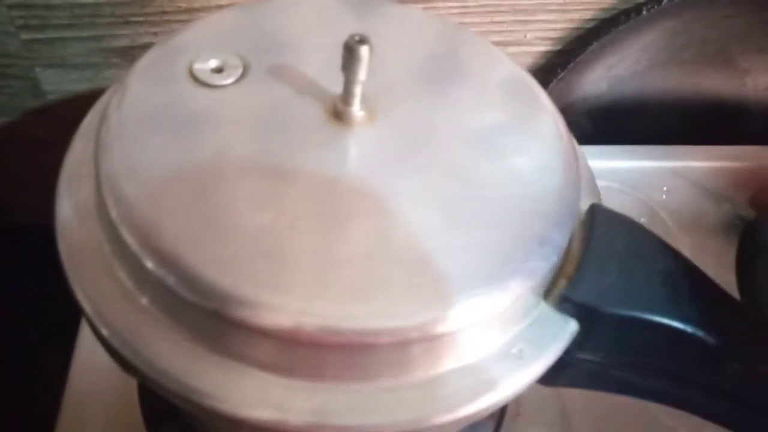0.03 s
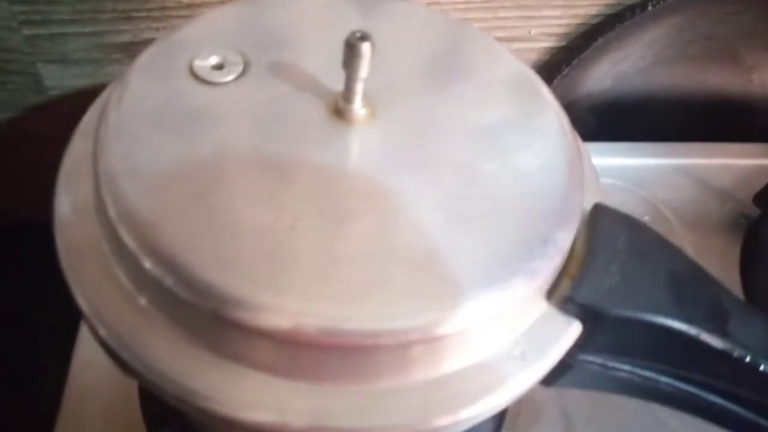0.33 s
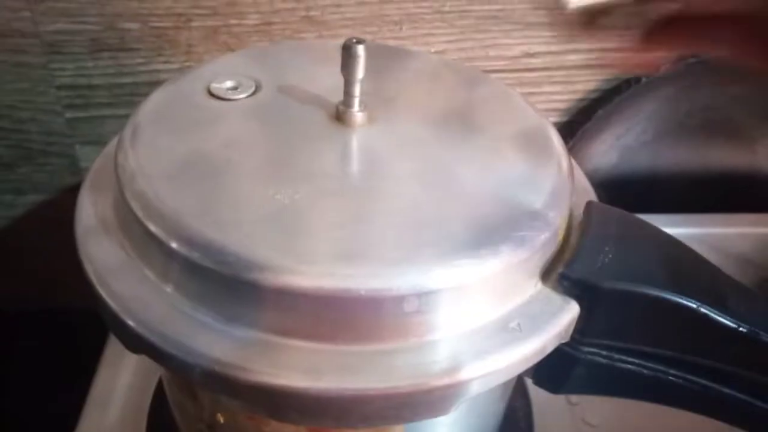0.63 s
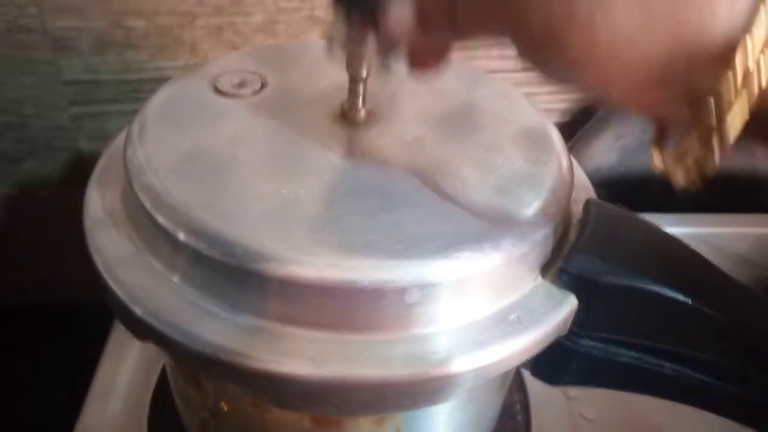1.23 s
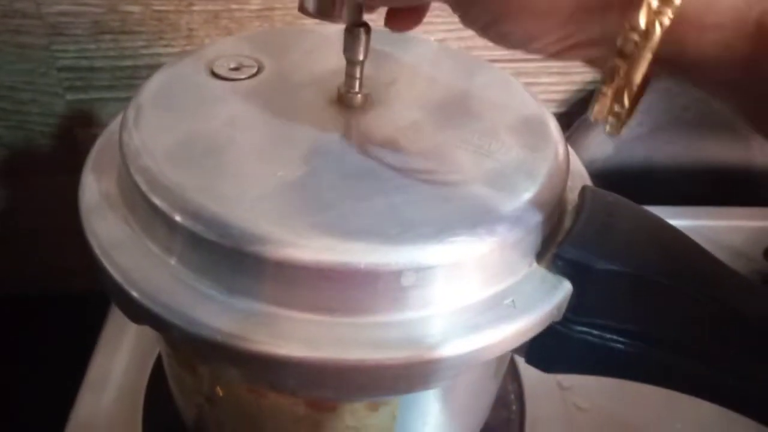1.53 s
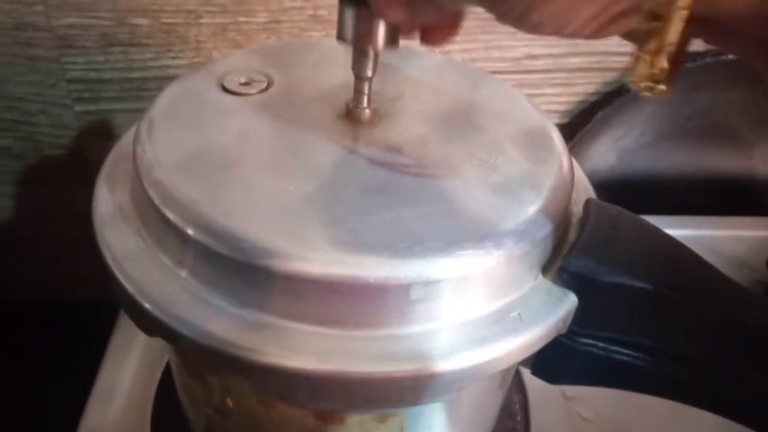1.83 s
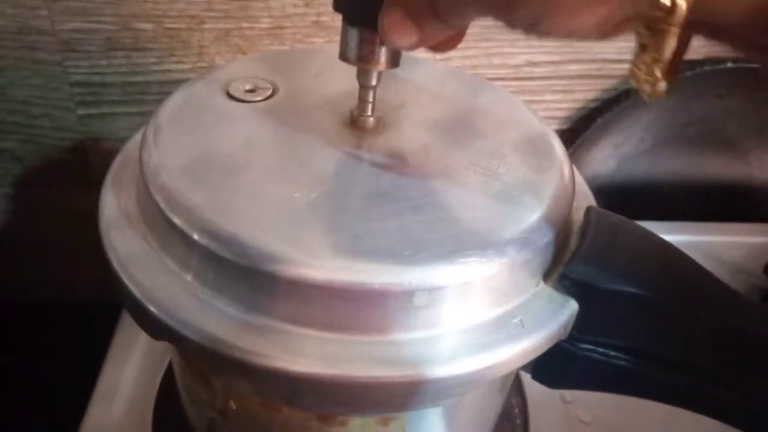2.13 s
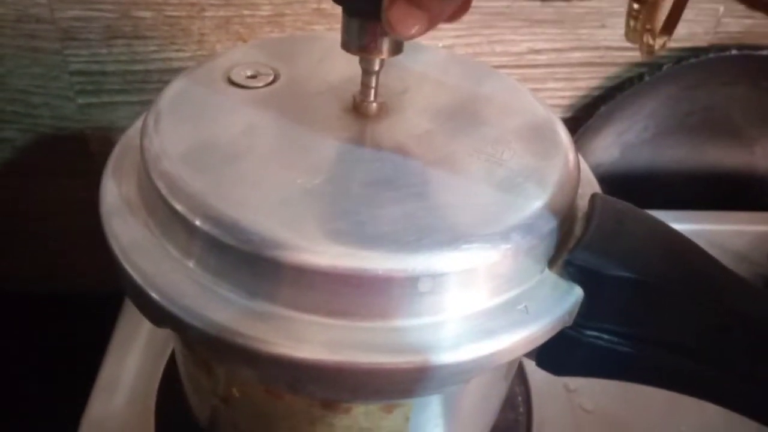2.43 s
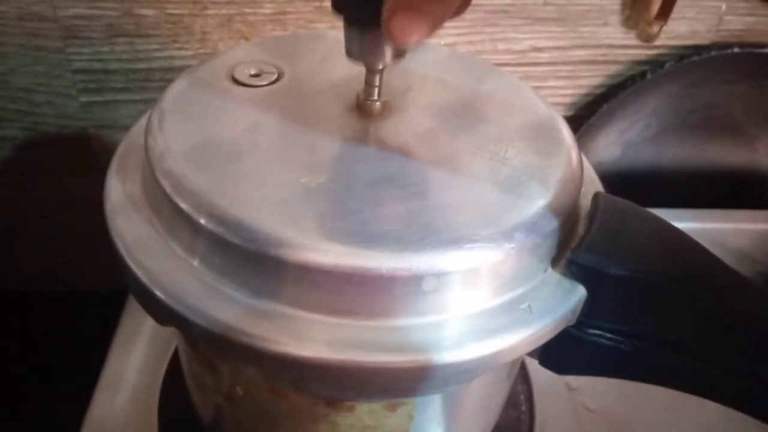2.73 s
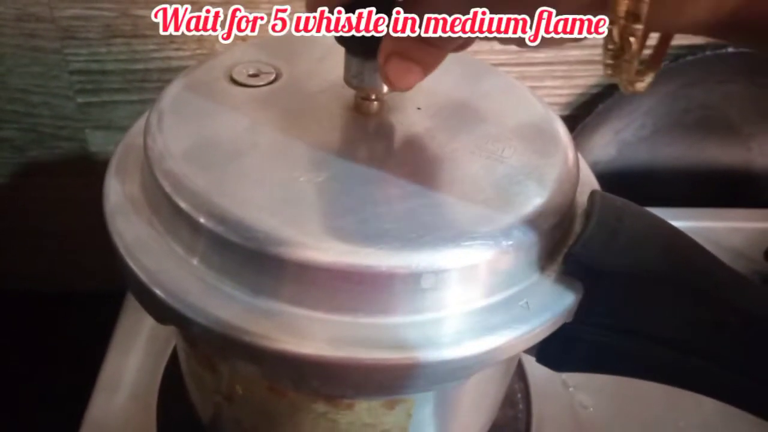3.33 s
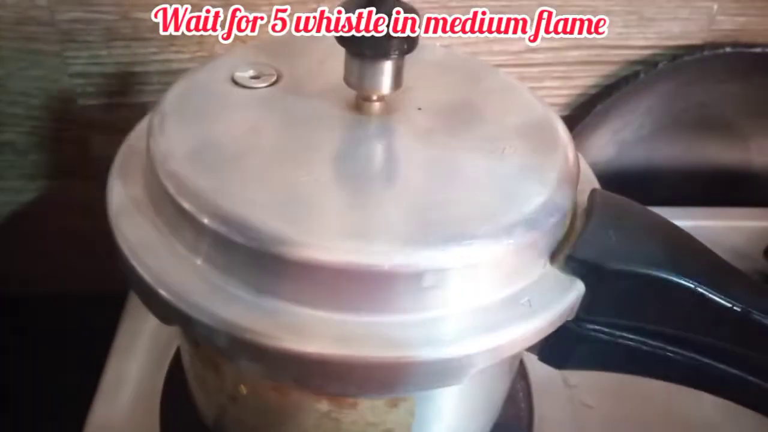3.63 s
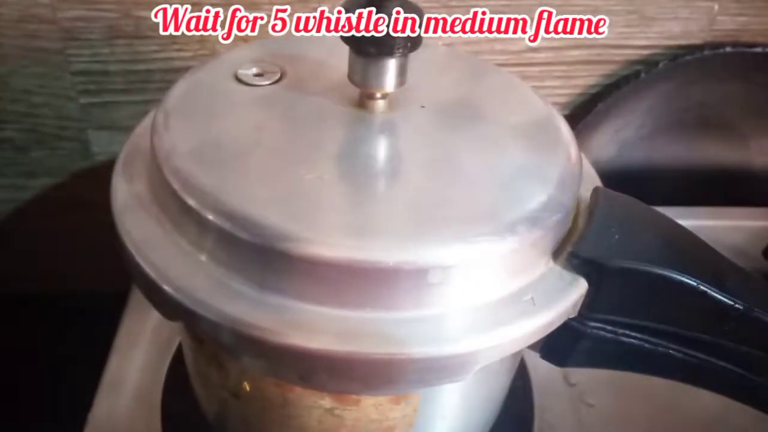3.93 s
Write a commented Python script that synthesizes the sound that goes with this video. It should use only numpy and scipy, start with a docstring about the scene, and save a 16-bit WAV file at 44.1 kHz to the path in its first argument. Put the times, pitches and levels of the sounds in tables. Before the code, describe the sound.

Steel weight tapping and scraping on a pressure cooker's vent pipe, then seating with a clack.

```python
"""A hand sets the steel weight on the vent pipe of a pressure cooker, in a small kitchen.
Mains hum, soft hiss and a rustle come first; all sound drops out briefly at 0.34 s. From 1.3 s the weight
taps the pipe, ringing the steel and rocking the pot, scrapes over the tip and creaks down in stick-slip
ticks while the pot shifts on the stove. Near 3 s it seats with a loud clack, held down by a limiter,
and the lid rings on."""
import sys
import numpy as np
from scipy import signal
from scipy.fft import rfft, irfft, next_fast_len
from scipy.io import wavfile
from scipy.ndimage import uniform_filter1d, minimum_filter1d, map_coordinates

SR = 44100
rng = np.random.default_rng(int(sys.argv[2]) if len(sys.argv) > 2 else 0)


def wav_record(signal):
    """Record a signal, one row per channel, as 16-bit PCM in the file named by sys.argv[1]."""
    frames = np.transpose(np.atleast_2d(signal))
    bounded = np.clip(frames, -1, 1)
    # unit amplitude maps onto the largest positive 16-bit level
    quanta = np.round(bounded * 32767).astype(np.int16)
    wavfile.write(sys.argv[1], SR, quanta)


N = 176400


def amp(db):
    """dB to gain."""
    return 10 ** (np.asarray(db) / 20)


def unit(x):
    """x at rms 1."""
    return x / np.sqrt(np.mean(x ** 2) + 1e-20)


def along(points, hz):
    """(Hz, value) points read on a log axis."""
    point_hz, values = np.transpose(points)
    return np.interp(np.log(hz + 1), np.log(point_hz + 1), values)


def fade(t, t60_s):
    """Exponential decay, 60 dB in t60_s."""
    return np.exp(-np.log(1000) * t / t60_s)


def colour(x, points, keep_power=False):
    """Minimum-phase filter with the gain of (Hz, dB) points."""
    size = 2 * next_fast_len(len(x) // 2 + 4096)
    gain = amp(along(points, np.fft.rfftfreq(size, 1 / SR)))
    cepstrum = irfft(np.log(unit(gain) if keep_power else gain), size)
    cepstrum[1:size // 2] *= 2
    cepstrum[size // 2 + 1:] = 0
    return irfft(rfft(x, size) * np.exp(rfft(cepstrum)), size)[:len(x)]


def noise(n, spectrum):
    """n samples of noise shaped by (Hz, dB) points, rms near 1."""
    return colour(rng.standard_normal(n), spectrum, keep_power=True)


def add(track, start_s, x):
    """Mix x into the track."""
    i = round(start_s * SR)
    track[i:i + len(x)] += x[:N - i]


def ring(modes, t, scatter_db=0.5):
    """Damped (Hz, dB, t60 s) modes of alternating sign; levels vary per call."""
    out = np.zeros(len(t))
    for k, (hz, db, t60_s) in enumerate(modes):
        gain = (-1) ** k * amp(db - scatter_db * rng.standard_normal())
        out += gain * fade(t, t60_s) * np.sin(2 * np.pi * hz * t)
    return out


def kitchen(x, room_db):
    """x plus wall reflections: a fresh noise tail whose treble dies first."""
    # Room decay. Each row: frequency in Hz, t60 in seconds.
    decay = [(100, .5), (300, .45), (900, .42), (2600, .38), (6000, .35), (10000, .31), (16000, .28)]
    # Tail colour. Each row: frequency in Hz, gain in dB.
    spectrum = [(80, 3), (300, 2.5), (900, -5), (2700, -10.5), (6000, -13), (15000, -3)]
    build_up_s = 0.0019
    hz, t, bins = signal.stft(rng.standard_normal(SR * 3 // 4), SR, nperseg=256)
    envelope = fade(t, along(decay, hz)[:, None]) * (1 - np.exp(-t / build_up_s))
    tail = signal.istft(bins * envelope, SR, nperseg=256)[1]
    tail = colour(tail / np.linalg.norm(tail), spectrum)
    return x + amp(room_db) * signal.fftconvolve(x, tail)[:len(x)]


def hum():
    """Mains hum and faint higher tones, each drifting in phase."""
    # Each row: frequency in Hz, rms level in dB.
    tones = [(100, -67.5), (200, -74), (300, -75.5), (383, -75.5), (1730, -77.5), (6385, -75.5)]
    drift_hz, drift_rad = 2.7, 0.9
    out, t = np.zeros(N), np.arange(N) / SR
    for hz, db in tones:
        knots = rng.standard_normal(int(N * drift_hz / SR) + 4)
        drift = map_coordinates(knots, [t * drift_hz])
        out += amp(db) * np.sqrt(2) * np.sin(2 * np.pi * hz * t + drift_rad * drift)
    return out


def rustle():
    """Soft noise that swells and fades, mostly in the first second."""
    # Each row: time in seconds, level in dB.
    envelope = [(0, -53), (.1, -55), (.3, -60.5), (.43, -59.5), (.5, -77), (.72, -74), (.77, -54.5),
                (.87, -62.5), (1, -81), (1.3, -82.5), (3.7, -74), (4, -70.5)]
    # Each row: frequency in Hz, relative level in dB.
    spectrum = [(60, -24), (280, 2.5), (600, -7), (1200, -15.5), (3000, -11), (7000, -20.5), (14000, -32)]
    level_db = np.interp(np.arange(N) / SR, *np.transpose(envelope))
    return amp(level_db) * noise(N, spectrum)


def hiss(level_db=-57.5):
    """Steady noise floor."""
    # Each row: frequency in Hz, relative level in dB.
    spectrum = [(18, -39), (30, -27), (70, -7), (100, 7), (115, -11), (124, -18), (204, -2.5), (233, -12),
                (252, -21.5), (287, -6.5), (384, -14), (526, -23.5), (649, -37), (780, -26.5), (913, -22.5),
                (1010, -18.5), (1160, -25), (1670, -20), (1860, -20), (3490, -18.5), (4910, -28.5),
                (6380, -15.5), (7270, -25.5), (9710, -23.5), (10400, -24.5), (11500, -33), (13800, -37),
                (15200, -19.5), (16000, -26.5)]
    return amp(level_db) * noise(N, spectrum)


def knocks():
    """The weight slides into each blow, which clicks, rattles the lid, rings the steel and rocks the pot."""
    # Weight on pipe; the last three rows are the clack landing twice and settling.
    # Each row: time in seconds, gain in dB, slide in dB, clatter t60 in seconds, click in dB, ring in dB,
    # ring t60 factor, thump in dB, thump centre in Hz, room in dB, then a gain in dB per tone band.
    blows = [(1.3129, -22.5, -50, 0.011, 4.5, -6, 0.55, -18, 357, 1.3, -17, -2.5, -6.5, -6, -8, 6.5, 3, -16, -10, -21),
             (1.564, -17.5, -32, 0.048, 1, -11.5, 0.96, -14.5, 185, 0.4, -18.5, 6.5, 0, 1.5, 3.5, -3, 4.5, -3, -17, -14),
             (1.7395, -33, -10, 0.022, -8, -17, 0.45, -18, 190, 0, 0, 4, 14, 2, -32, -18, -11, -20, -24, -28),
             (1.9046, -35.5, -13, 0.03, -2, -11.5, 0.98, -14, 200, -9, 4, 2, 7, 2, -16, -11, -3, -29, -23, -27),
             (1.993, -49, -30, 0.012, -2, -15, 0.28, -12, 196, -3, -8, -5, -6, -11, -4, -1, -4, 4, 5, 16),
             (2.0058, -47.5, -17, 0.056, -22, -2, 0.39, 7, 104, -8, -6, 20.5, 3, 8, -15, -14, -23, -15, -5, 0),
             (2.2608, -18, -5.5, 0.02, -2, -12, 0.32, -9, 211, -5, -25, 1, -17, 1.5, 5.5, -7.5, -5, -9, -16, -7),
             (2.2669, -32, -25, 0.047, -25, -8, 0.59, -1.5, 69.5, 3.5, -27, 13.5, 0, -4, -3, -4, -1, -1, -8, -16),
             (2.9665, -7.5, -38, 0.064, -10, -6.5, 0.25, -3.5, 119, -8, 1, 7.5, 3.5, -1, 6.5, 4, 7, 0.5, 1, 9.5),
             (2.9715, -3, -32, 0.035, -24, -15, 0.49, -14.5, 266, -1.5, -6.5, 3.5, 2.5, 1, -0.5, 7.5, 7, 12.5, 1.5, 5),
             (3.029, -28, -12.5, 0.085, -15, -15, 0.5, -26, 200, 5.5, -14, -9, -16, -7, 16, 1, -7, -5, -1, 8)]
    # Tone bands of a blow.
    bands_hz = [250, 900, 1600, 2700, 4000, 5200, 6200, 7400, 10000, 15000]
    # Dense lid modes. Each row: frequency in Hz, relative level in dB.
    clatter = [(60, -45.5), (250, -4.5), (600, -6.5), (1300, -6.5), (2500, 10), (3500, -1), (5700, 3),
               (7200, -3.5), (8500, -9), (11200, -11.5), (12500, -21), (15000, -11.5), (16500, -12)]
    # After-ring of the whole lid, same columns.
    shimmer = [(300, -23.5), (1500, -8), (2300, 11), (2900, 6.5), (3600, -7.5), (5600, 1.5), (7500, -13),
               (10000, -16), (15000, -32.5)]
    # Weight and pipe before seating. Each row: frequency in Hz, relative level in dB, base t60 in seconds.
    held_modes = [(1152, -39, 0.05), (1480, -10.5, 0.13), (1567, -8.5, 0.12), (1860, -8.5, 0.16),
                  (2120, -18, .06), (2580, -19.5, 0.087), (2590, -2, 0.094), (2820, -4, 0.17),
                  (2800, -2.5, 0.19), (2980, 1, 0.096), (3600, -9, 0.044), (3853, -11.5, 0.36),
                  (3970, -4, 0.061), (3910, 4, 0.046), (4170, 4.5, 0.044), (4900, -6, 0.05),
                  (5276, -14, 0.048), (5300, -2, 0.029), (5750, -12, 0.11), (6000, -15, 0.092),
                  (6040, -14, 0.25), (6420, -16, .09), (7100, 2, 0.066)]
    # Lid with the weight seated, same columns.
    seated_modes = [(847, -9, .05), (928, -5, 0.085), (1301, -10.5, 0.19), (2040, -10, 0.5),
                    (2175, -7, 0.39), (2320, -8.5, 0.33), (2364, -14, 0.31), (2436, -9, .25),
                    (2660, -17.5, .2), (2640, -18.5, 0.17), (2792, -1.5, 0.51), (2873, 2.5, 0.26),
                    (3968, -5.5, 0.15), (5070, -10.5, 0.084), (5430, -0.5, 0.17), (5920, -7.5, .18),
                    (5765, -1, .26), (5880, -19.5, 0.15), (6540, -13.5, 0.16), (6620, -14, 0.15),
                    (6870, -16, 0.11), (15900, -14.5, 0.062)]
    # Pot rocking on the stove. Each row: frequency in Hz, relative level in dB, t60 in seconds.
    pot_modes = [(75.5, -3, 0.12), (119, -5.5, 0.052), (198.4, -2, 0.12), (257.4, -4.5, 0.056),
                 (333, 0, 0.097), (385, -4.5, .05)]
    seated_s, slide_t60_s = 2.9, 0.035
    shimmer_db, shimmer_t60_s = -20.5, 0.49
    thump_rise_s, skirt_db = 0.0017, -18
    out, lead = np.zeros(N), SR // 25
    clock = np.arange(-lead, SR * 3 // 4) / SR  # zero at impact
    t, struck = np.maximum(clock, 0), clock >= 0
    for (at_s, db, slide_db, t60_s, click_db, ring_db, t60_factor,
         thump_db, thump_hz, room_db, *tone_db) in blows:
        seated = at_s > seated_s
        slide = amp(slide_db) * fade(np.abs(clock), slide_t60_s)  # swells up to the impact
        contact = rng.standard_normal(len(t)) * np.where(struck, fade(t, t60_s), slide)
        contact[lead] = 8 * amp(click_db)
        modes = seated_modes if seated else held_modes
        damped = [(hz, mode_db, base_s * t60_factor) for hz, mode_db, base_s in modes]
        steel = colour(contact, clatter, keep_power=True) + amp(ring_db) * ring(damped, t)
        if seated:
            steel += amp(shimmer_db) * noise(len(t), shimmer) * fade(t, shimmer_t60_s) * struck
        steel = colour(steel, list(zip(bands_hz, tone_db)))
        rocking = ring(pot_modes, t) * (1 - np.exp(-t / thump_rise_s))
        thump_band = [(thump_hz / 2, skirt_db), (thump_hz, 0), (thump_hz * 2, skirt_db)]
        thump = amp(thump_db) * colour(rocking, thump_band)
        blow = kitchen(steel, room_db) + kitchen(thump, room_db=-7.5)
        add(out, at_s + clock[0], amp(db) * blow)
    return out


def scrapes():
    """The weight rubs on the pipe: dense tiny slips swell and die in the lid's resonances."""
    # Each row: peak time, rise and fall t60 in seconds, base level in dB, treble in dB.
    rubs = [(1.732, 0.012, 0.061, -33, -30.5), (1.742, 0.0076, 0.1, -33, -7.5),
            (1.777, 0.037, 0.18, -41.5, 7), (1.868, 0.016, 0.18, -50, 10), (1.888, .015, 0.1, -43.5, -2),
            (1.914, .016, 0.11, -35.5, -7), (1.943, 0.019, 0.12, -44, 5), (2.009, .02, 0.033, -43, 23),
            (2.537, 0.024, 0.1, -50.5, 25), (2.573, 0.035, 0.2, -52, 13.5), (2.727, 0.0085, 0.26, -53, 16),
            (2.819, 0.0018, 0.052, -48, -1), (2.929, 0.038, 0.099, -45.5, 1.5),
            (2.952, 0.036, 0.053, -46, 22)]
    # Friction noise. Each row: frequency in Hz, relative level in dB.
    spectrum = [(150, -26.5), (450, -28.5), (660, 10), (950, 5), (1300, -3), (1900, -15.5), (2400, 6),
                (2900, 4), (3600, -6), (4700, -13.5), (6000, -8), (7500, -18), (15000, -58.5)]
    # Modes a rub excites. Each row: frequency in Hz, relative level in dB, t60 in seconds.
    modes = [(592, 0, 0.039), (623, -10, 0.14), (731, 2.5, 0.023), (928, -4, 0.087), (1524, -1.5, 0.12),
             (1612, 5.5, 0.045), (1957, 10, 0.0227), (2170, -0.5, 0.07), (2450, -19.5, 0.025),
             (2660, -20, 0.091), (2856, 11.5, 0.083), (6080, 1.5, 0.019)]
    slips_per_s, ring_db = 1700, 2
    out, t = np.zeros(N), np.arange(SR // 2) / SR
    for peak_s, rise_s, t60_s, db, treble_db in rubs:
        slips = unit(rng.standard_normal(len(t)) * (rng.random(len(t)) < slips_per_s / SR))
        ringing = unit(signal.fftconvolve(slips, ring(modes, t))[:len(t)])
        rub = unit(colour(slips, spectrum, keep_power=True) + amp(ring_db) * ringing)
        rub = colour(rub, [(2000, 0.012), (5000, treble_db)], keep_power=True)
        envelope = np.minimum(t / rise_s, 1) ** 2 * fade(np.maximum(t - rise_s, 0), t60_s)
        add(out, peak_s - rise_s, amp(db + treble_db / 2) * rub * envelope)
    return out


def ticks():
    """The gripped weight sticks and slips down the pipe; each gritty slip rings it briefly."""
    # Each row: start in seconds, gain in dB.
    slips = [(1.995, -54), (2.379, -39), (2.3968, -40), (2.419, -47.5), (2.428, -40.5), (2.4414, -38),
             (2.464, -48), (2.484, -43), (2.5205, -45.5), (2.5386, -39), (2.5476, -40.5), (2.557, -48.5),
             (2.565, -41.5), (2.572, -42), (2.5794, -44), (2.6009, -41), (2.658, -46), (2.6678, -45),
             (2.684, -45), (2.714, -44.5)]
    # Gripped weight. Each row: frequency in Hz, relative level in dB, t60 in seconds.
    modes = [(1086, -12, 0.011), (1757, -13, 0.0141), (2530, -2.5, 0.01255), (2668, -2, 0.012),
             (2960, -1.5, 0.014), (4000, -9, 0.007), (6380, -2, 0.0036), (7360, -3, 0.0046)]
    # Each row: frequency in Hz, relative level in dB.
    grit_spectrum = [(300, -17), (1000, -11), (2800, 1), (4800, -9.5), (6500, 3.5), (8500, -18),
                     (15000, -41)]
    ring_db, grit_db, grit_t60_s = 2, -7.5, 0.028
    out, t = np.zeros(N), np.arange(SR // 20) / SR
    for start_s, db in slips:
        burst = rng.standard_normal(len(t)) * fade(t, grit_t60_s)
        grit = colour(burst, grit_spectrum, keep_power=True)
        add(out, start_s, amp(db) * (amp(ring_db) * ring(modes, t) + amp(grit_db) * grit))
    return out


def pot_shifts():
    """Dull, soft bumps as the pot shifts on the stove under the hand."""
    # Each row: peak time in seconds, level in dB.
    bumps = [(2.03, -63), (2.159, -62.5), (2.821, -55.5), (2.859, -59.5), (2.941, -52.5)]
    # Each row: frequency in Hz, relative level in dB.
    spectrum = [(40, -24.5), (80, 5.5), (200, -3.5), (350, -6), (550, -18.5), (2000, -57.5)]
    rise_s = 0.046
    out, t = np.zeros(N), np.arange(SR // 4) / SR
    envelope = t / rise_s * np.exp(1 - t / rise_s)
    for peak_s, db in bumps:
        add(out, peak_s - rise_s, amp(db) * noise(len(t), spectrum) * envelope)
    return out


def scene():
    """All sources, alike in both channels."""
    cooker = knocks() + kitchen(scrapes(), room_db=0.5) + kitchen(ticks(), room_db=4) + pot_shifts()
    mono = cooker + hum() + rustle() + hiss()
    return np.array([mono, mono])


def record(dry):
    """Fast limiter with slow release, brief dropout, soft clip, low-pass."""
    threshold_db, release_db_per_s = 1, 63
    mute_from_s, mute_to_s = 0.3378, 0.3955
    ceiling_db, cutoff_hz = -2.1, 16100
    t = np.arange(N) / SR
    over_db = np.maximum(20 * np.log10(np.abs(dry[0]) + 1e-9) - threshold_db, 0)
    cut_db = np.maximum.accumulate(over_db + release_db_per_s * t) - release_db_per_s * t
    gain_db = uniform_filter1d(minimum_filter1d(-cut_db, size=31), size=31)  # smooth look-ahead attack
    unmuted = (t < mute_from_s) | (t > mute_to_s)
    limited = dry * amp(gain_db) * unmuted
    clipped = limited / (1 + (limited / amp(ceiling_db)) ** 8) ** (1 / 8)
    low_pass = 1 / (1 + (np.fft.rfftfreq(N, 1 / SR) / cutoff_hz) ** 160)
    return irfft(rfft(clipped) * low_pass, N)


dry = scene()
out = record(dry)
wav_record(out)
```